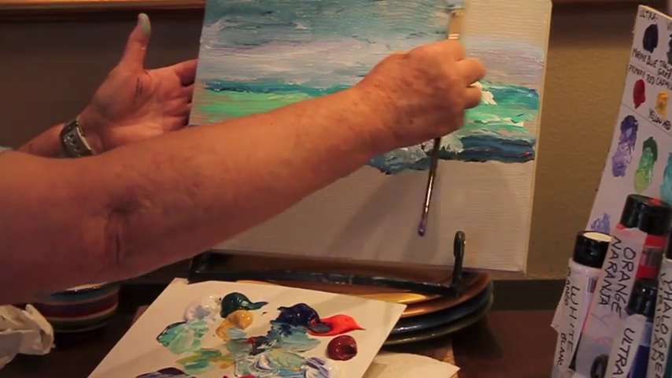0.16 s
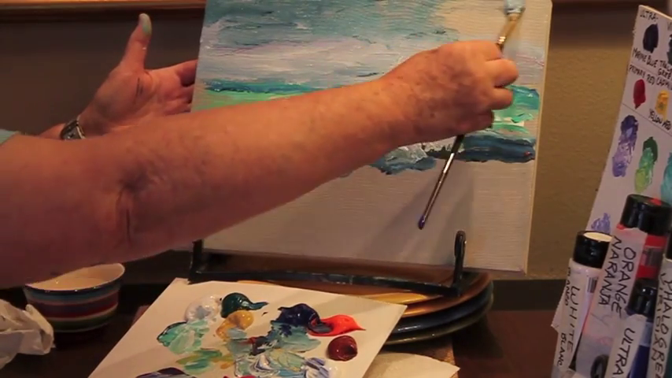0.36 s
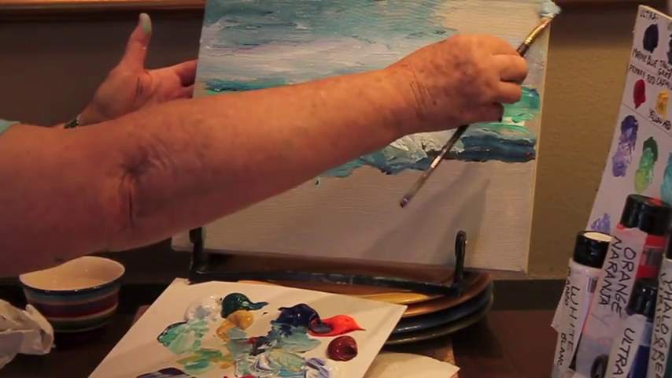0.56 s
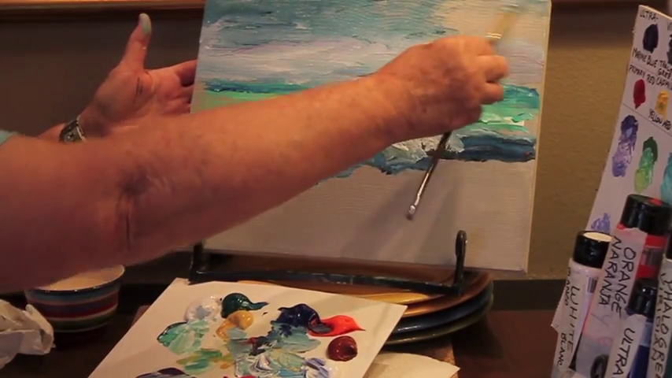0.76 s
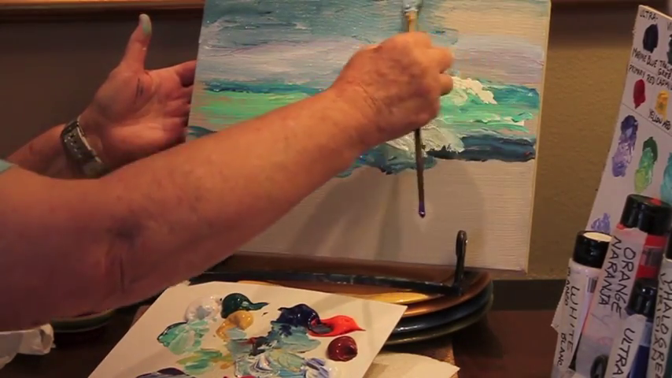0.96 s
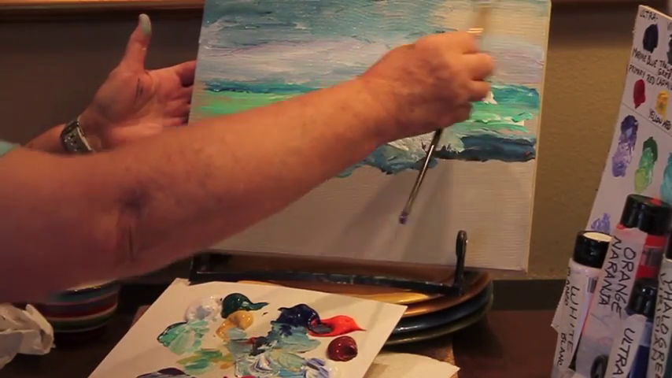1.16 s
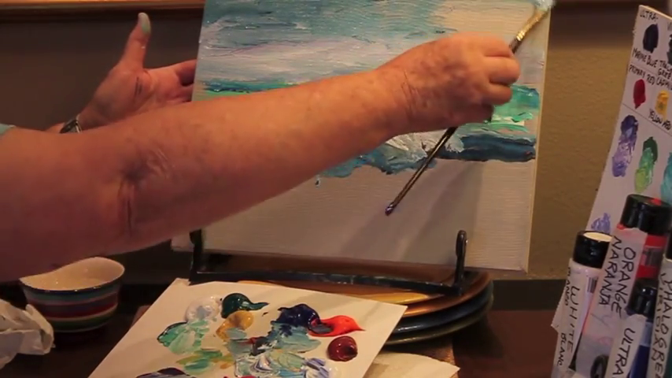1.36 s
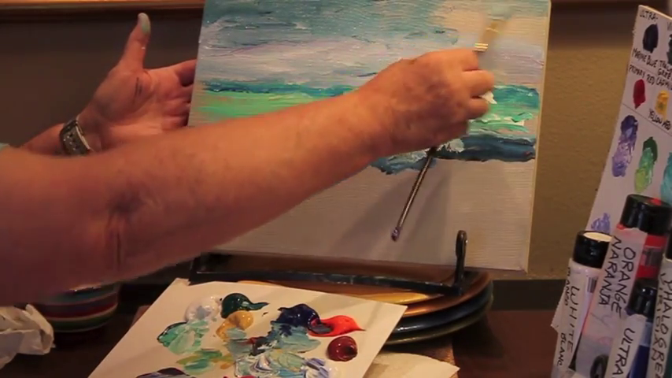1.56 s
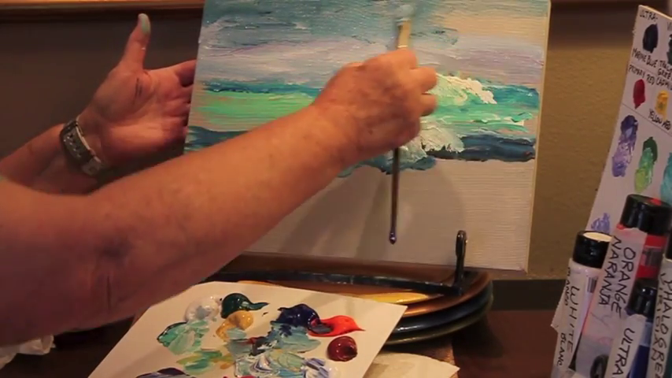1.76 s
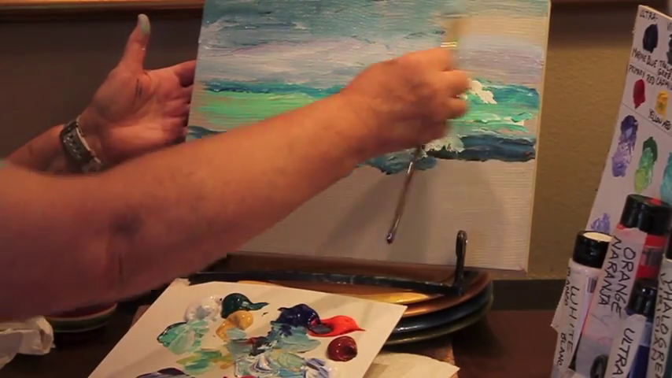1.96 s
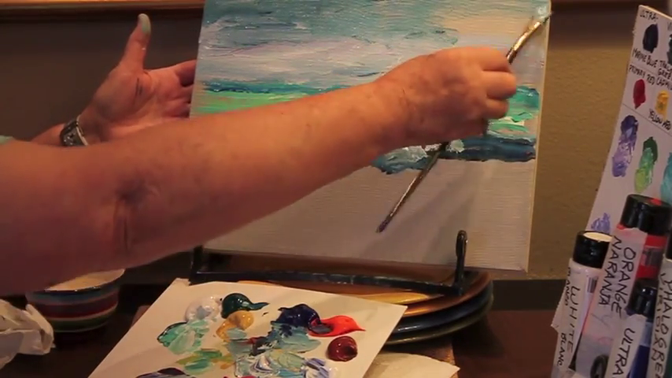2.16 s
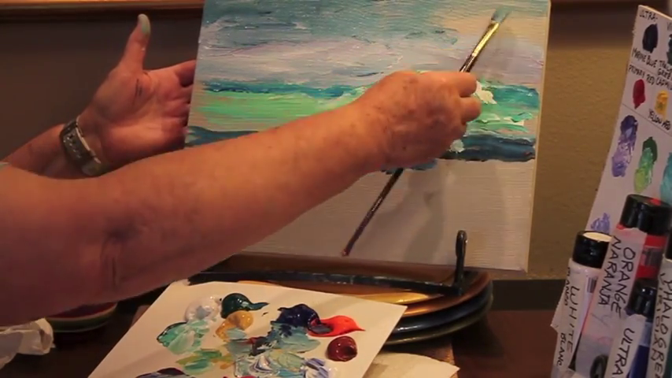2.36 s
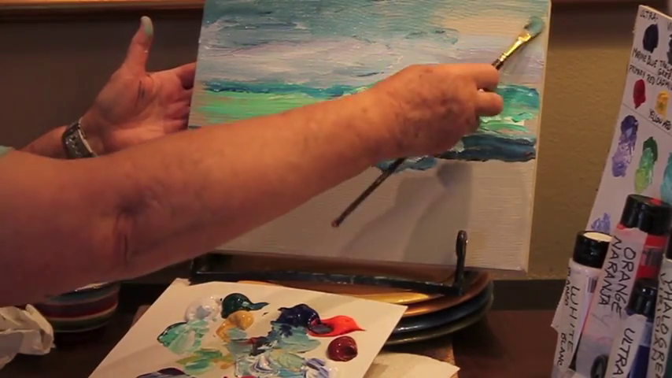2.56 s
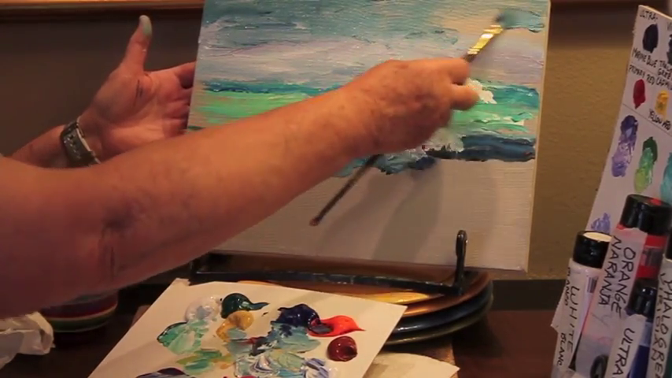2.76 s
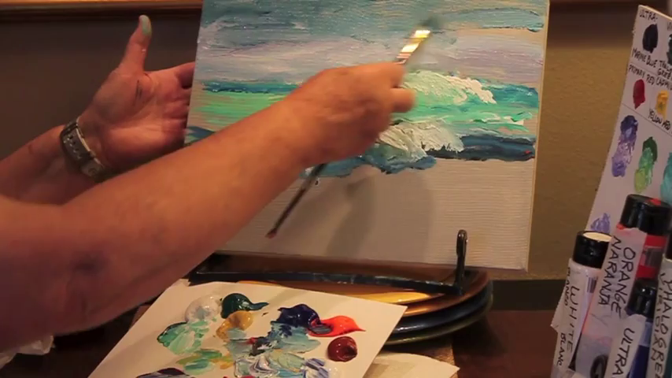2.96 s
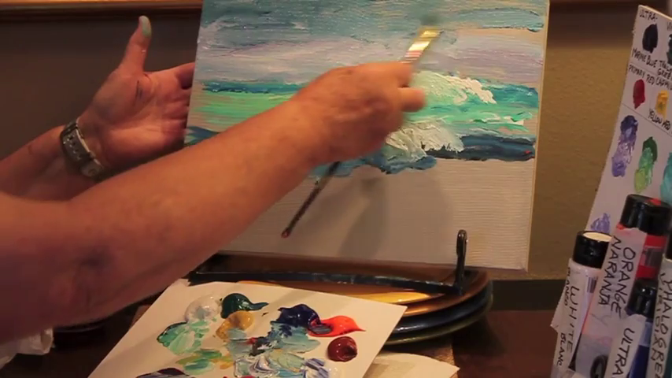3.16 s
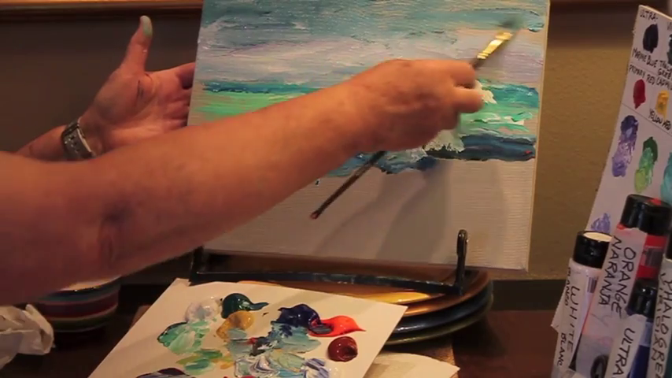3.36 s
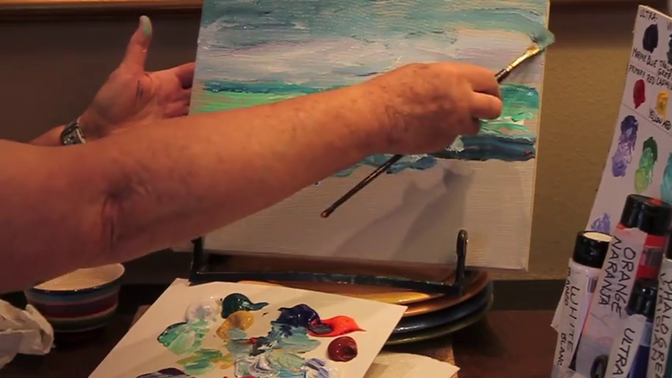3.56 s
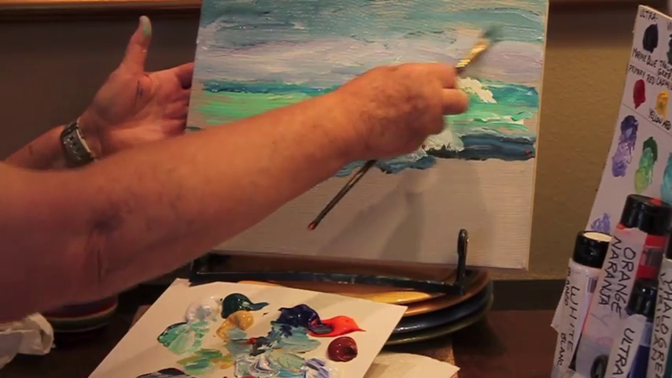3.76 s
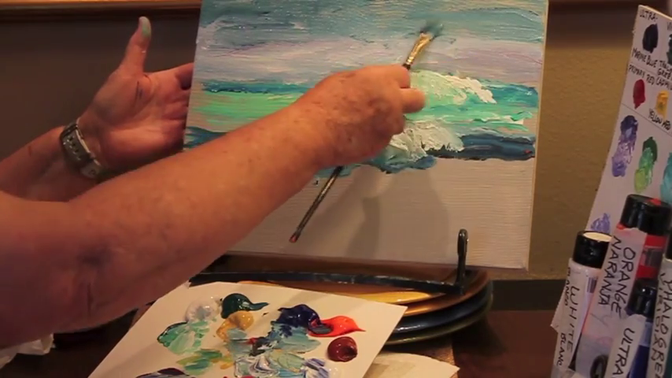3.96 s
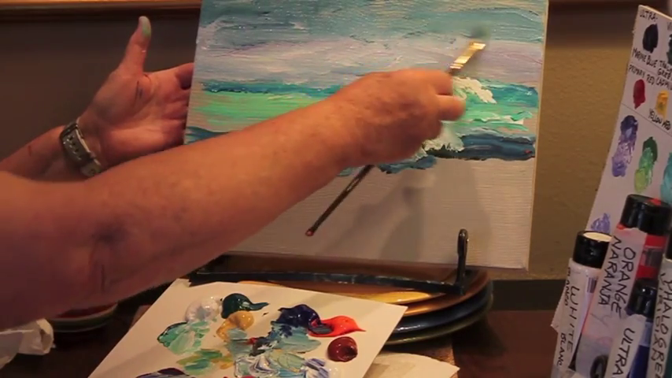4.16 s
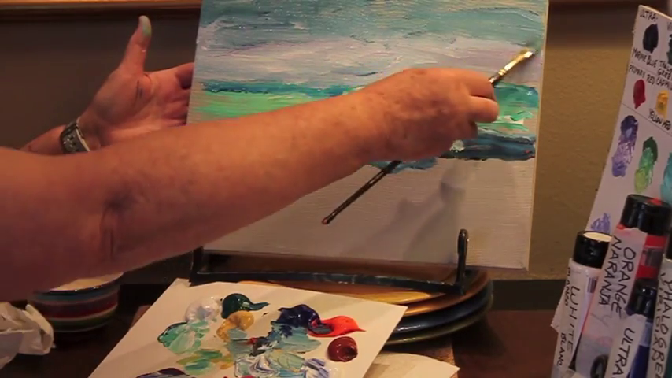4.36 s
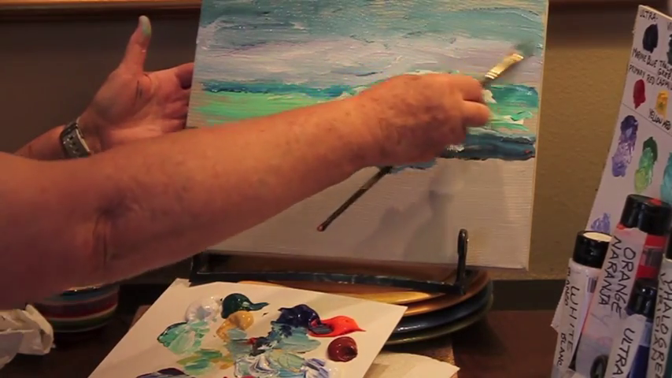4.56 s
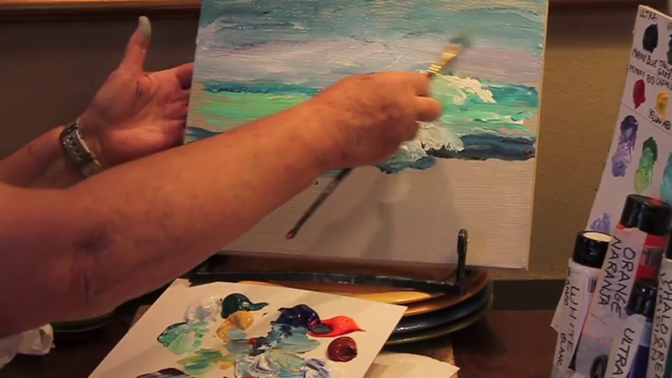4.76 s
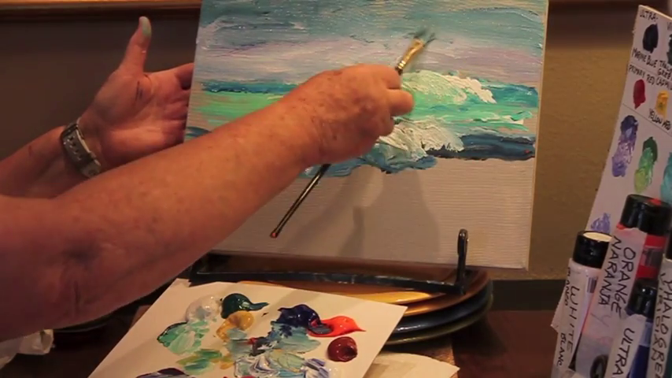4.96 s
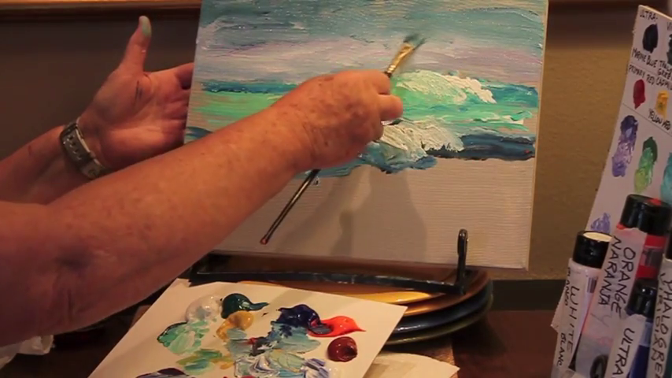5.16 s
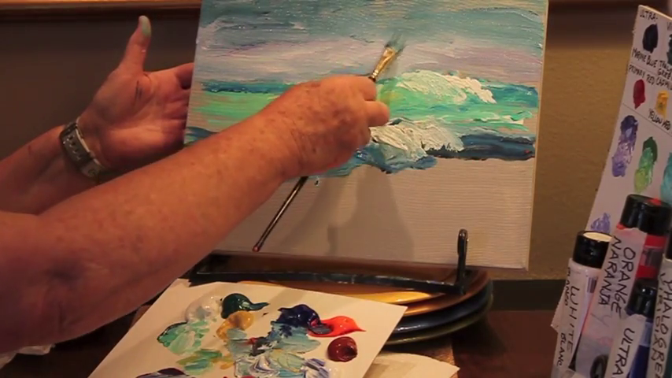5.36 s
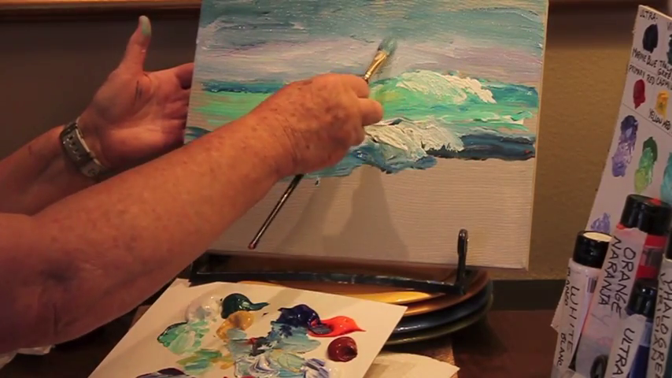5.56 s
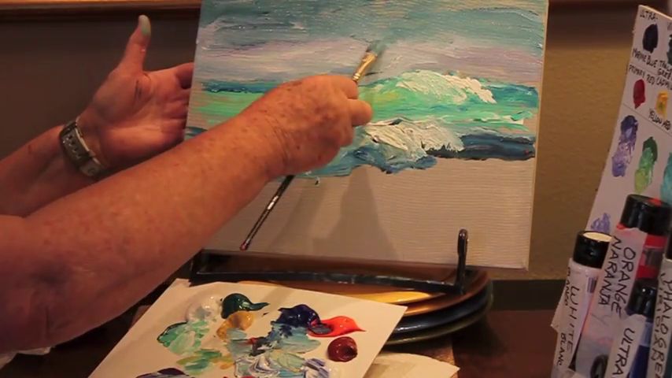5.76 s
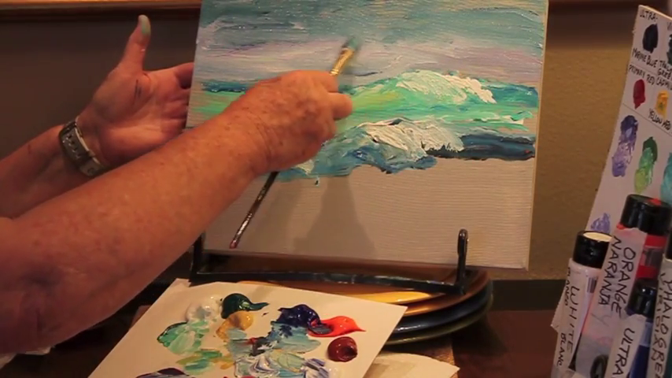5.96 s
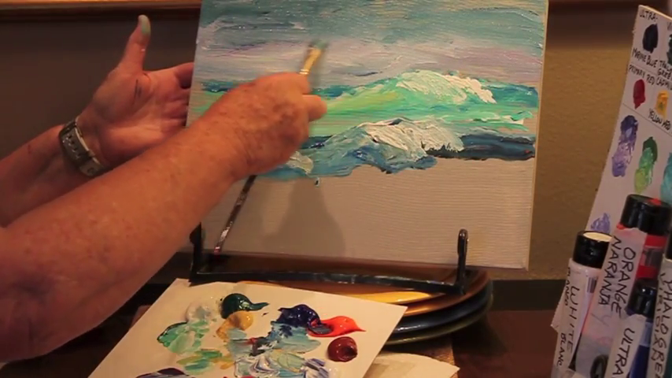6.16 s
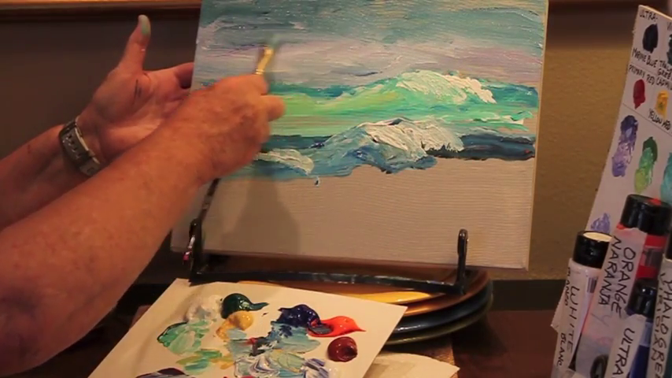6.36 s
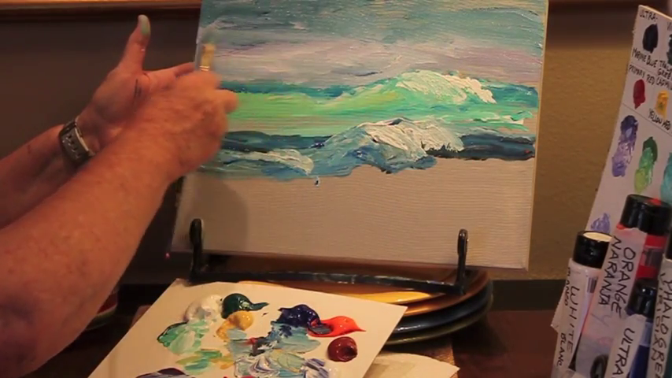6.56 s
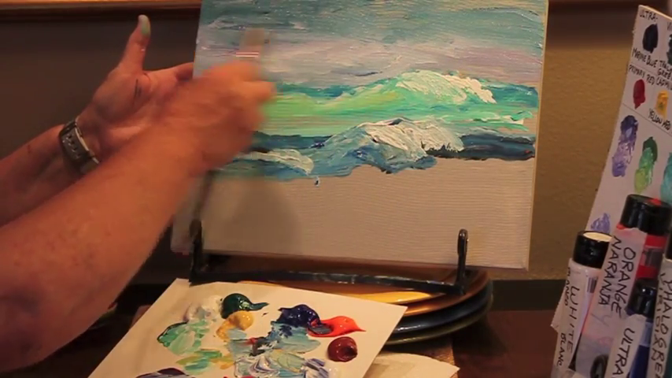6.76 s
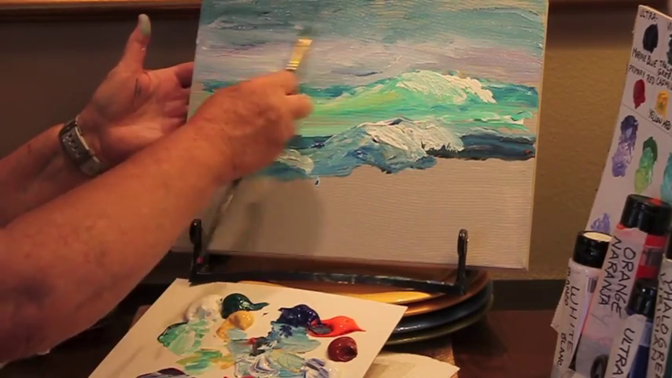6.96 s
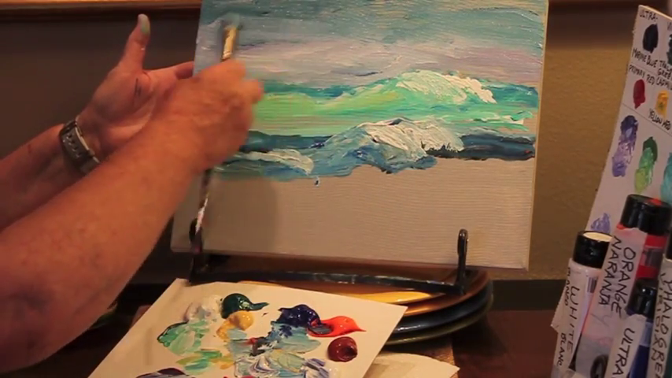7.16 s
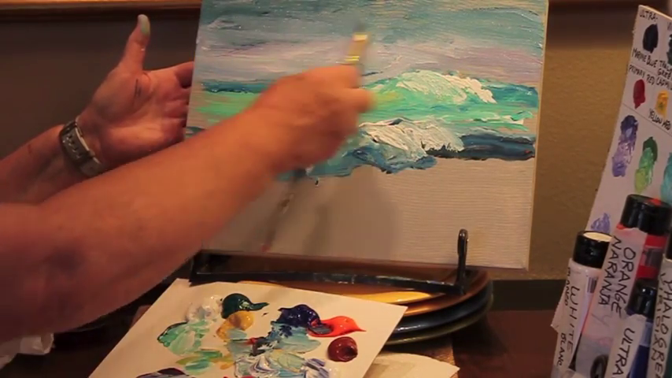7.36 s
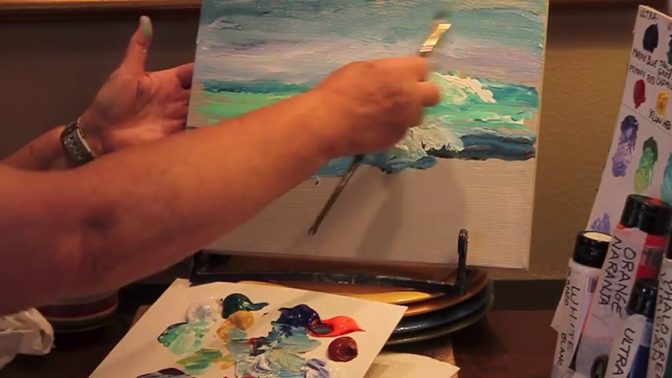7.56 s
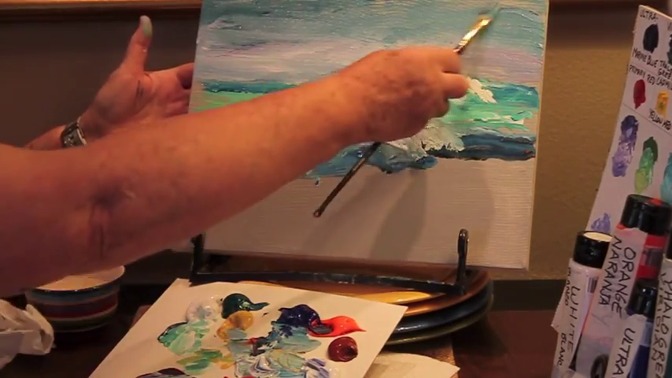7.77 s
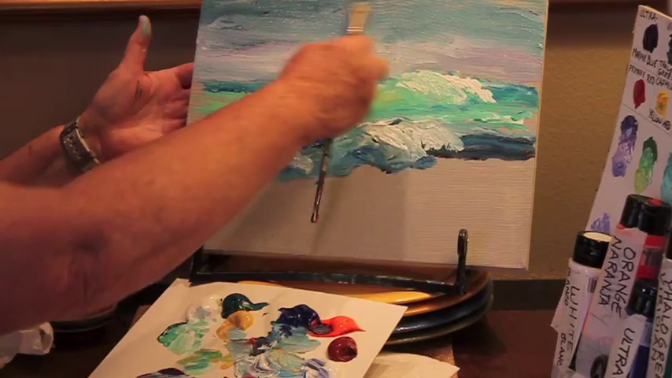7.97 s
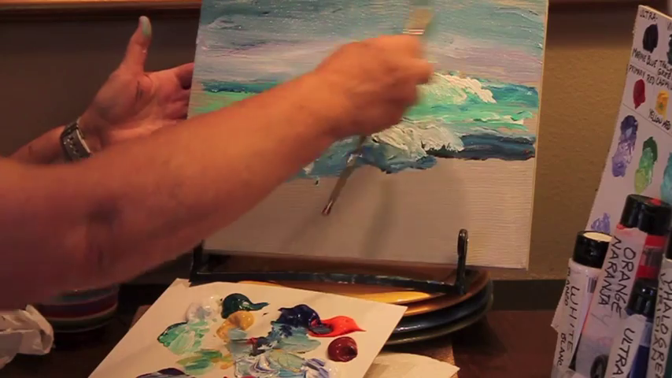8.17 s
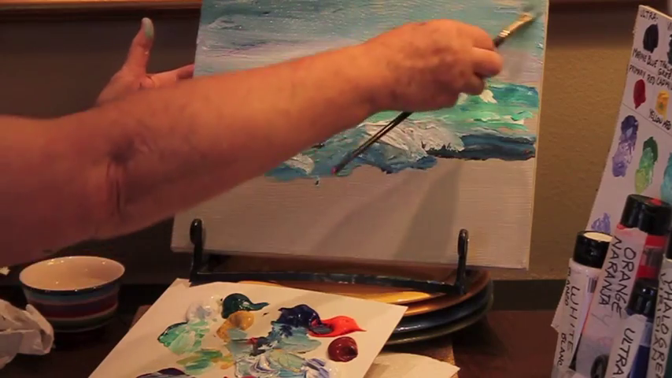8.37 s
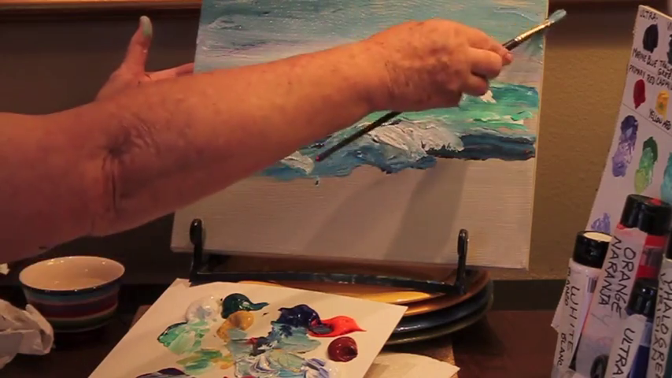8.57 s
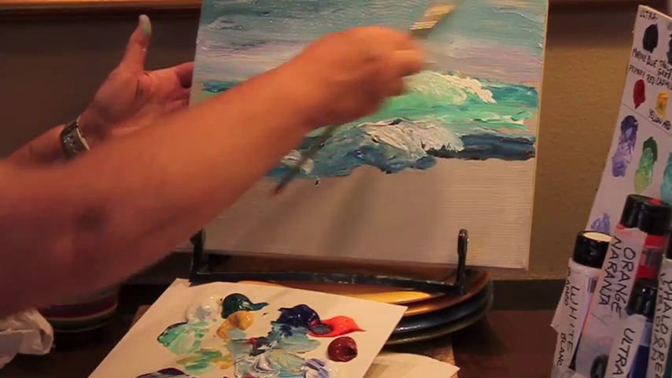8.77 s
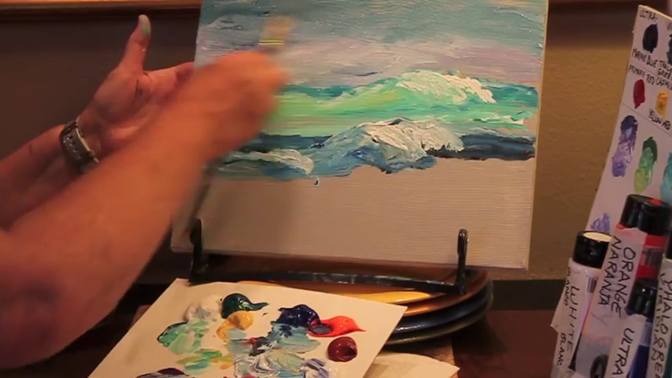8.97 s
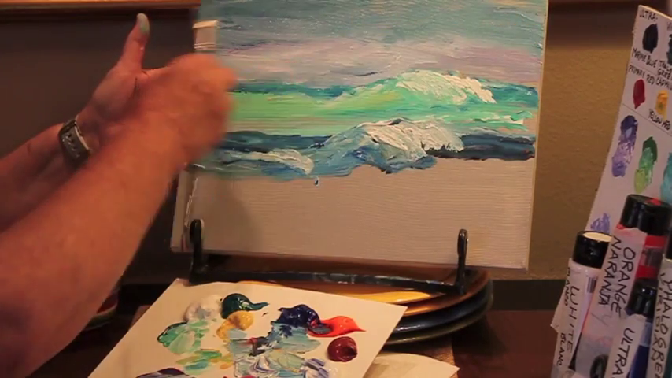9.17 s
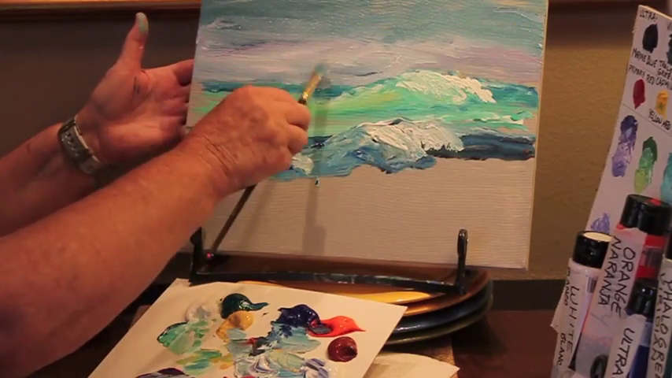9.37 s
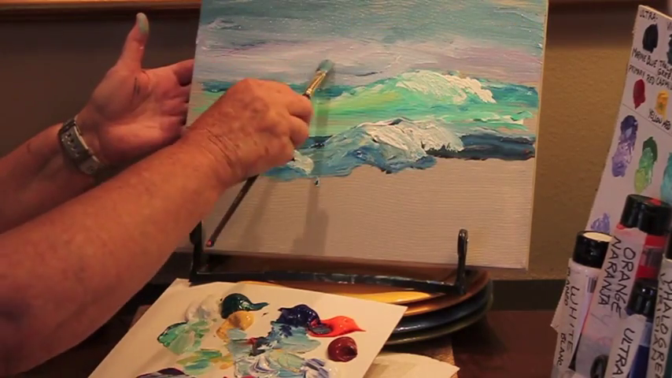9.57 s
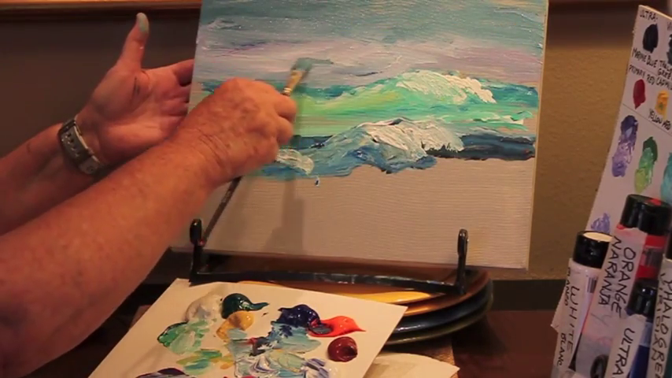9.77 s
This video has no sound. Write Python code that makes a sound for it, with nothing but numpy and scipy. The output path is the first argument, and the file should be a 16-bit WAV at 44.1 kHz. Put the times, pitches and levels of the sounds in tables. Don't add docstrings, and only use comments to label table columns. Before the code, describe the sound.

Dry, bristly brush strokes rasp and tick on a resonant canvas board, loud at first then lighter, above a faint steady throbbing hum indoors.

```python
import sys
import numpy as np
from scipy import signal
from scipy.fft import rfft, irfft, next_fast_len
from scipy.io import wavfile
from scipy.ndimage import uniform_filter1d

SR = 44100
rng = np.random.default_rng(int(sys.argv[2]) if len(sys.argv) > 2 else 0)


def ratio(d):
    e = np.asarray(d, float) / 20
    return 10 ** e


def dump(signal):
    limited = np.clip(np.atleast_2d(signal).T, -1, 1)
    pcm = np.round(limited * 32767).astype(np.int16)
    wavfile.write(sys.argv[1], SR, pcm)


N = 432621
T = np.arange(N) / SR
SLOW_T = np.arange(0, N + 40, 40) / SR


def rms_one(x):
    return x / np.sqrt(np.mean(x ** 2) + 1e-20)


def fft_grid():
    size = next_fast_len(N)
    return size, np.arange(size // 2 + 1) * SR / size + 1


def colour(x, points):
    hz, db = np.transpose(points)
    size, f = fft_grid()
    level_db = np.interp(np.log(f), np.log(hz), db)
    return irfft(rfft(x, size) * ratio(level_db), size)[:N]


def band(x, lo_hz, hi_hz):
    return signal.sosfilt(signal.butter(2, [lo_hz, hi_hz], "band", fs=SR, output="sos"), x)


def drift(rate_hz):
    r = np.exp(-80 * np.pi * rate_hz / SR)
    noise = rng.standard_normal(len(SLOW_T) + 2000)
    settled = signal.lfilter([1], [1, -2 * r, r * r], noise)[2000:]
    return rms_one(settled)


def gain(db):
    return np.interp(T, SLOW_T, ratio(db))


# (frequency [Hz], level per Hz [dB])
AIR_COLOUR = [(46, -23), (58, -8), (110, -5), (200, -4.5), (260, 0), (330, -8.5), (440, -0.5), (520, -6.5),
              (700, -7.5), (1000, -9.5), (1600, -17), (3000, -20), (8000, -25), (15800, -30)]


def air():
    rush = rms_one(colour(rng.standard_normal(N), AIR_COLOUR))
    return gain(-52.5 + 0.5 * drift(2.2)) * rush


# (frequency [Hz]), then their (level [dB])
HUM_HZ = [58.4, 101.96, 120.01, 167.1, 178.41, 203.9, 280.38, 287.77, 291.97, 407.82, 440.72, 451.38,
          467.15]
HUM_DB = [-76, -74.5, -67.5, -73.5, -65.5, -70, -68, -65, -55, -65, -67.5, -68.5, -61]
PAIR_DB = [-56.5, -57.5]
# (time [s], lead of the faster one [turns])
MOTOR_SLIP = [
    (-.23, 0),
    (4.62, 9),
    (5.25, 10),
    (5.81, 11),
    (6.72, 13),
    (7.29, 14),
    (9.14, 17),
    (10.22, 19),
]


def motors():
    pair_hz = 233.58
    lines = 0
    for hz, db in zip(HUM_HZ, HUM_DB):
        lines = lines + ratio(db) * np.sin(2 * np.pi * (hz * T + rng.random()))
    lead_turns = np.interp(T, *np.transpose(MOTOR_SLIP)) + 0.5
    slower = ratio(PAIR_DB[0]) * np.cos(2 * np.pi * pair_hz * T)
    faster = ratio(PAIR_DB[1]) * np.cos(2 * np.pi * (pair_hz * T + lead_turns))
    return np.sqrt(2) * (lines + slower + faster)


# (delay [s], level [dB])
ECHOES = [
    (.0013, -25.5),
    (.0031, -27),
    (.0047, -18.5),
]


def room(x):
    t60_s, tail_db = 0.25, -12.5
    u = np.arange(SR // 2) / SR
    tail = band(rng.standard_normal(len(u)), 410, 6300) * ratio(-60 * u / t60_s) * (u > 0.006)
    tail = ratio(tail_db) * tail / np.linalg.norm(tail)
    for delay, db in ECHOES:
        tail[round(delay * SR)] = ratio(db)
    return signal.fftconvolve(x, tail)[:N]


# (time [s], peak level [dB], low part relative to it [dB])
PAINT_TICKS = [(0.108, -18, -14), (0.2032, -15, -21), (0.4415, -24, -16), (0.7607, -23, -12),
               (1.1804, -21, -16), (1.506, -28, -11), (2.0344, -17, -16), (2.8983, -30, -11),
               (4.2087, -26, -6), (4.3056, -37, -15), (4.5979, -37, -11), (4.8514, -33, -15),
               (4.8948, -42, -16), (4.9631, -40, -17), (5.0394, -42, -10), (5.1362, -43, -15),
               (5.2465, -39, -15), (5.2894, -42, -14), (6.1793, -40, -21), (6.3904, -42, -21),
               (6.5271, -39, -19), (6.996, -30, -22), (8.9391, -27, -9), (9.7737, -42, -17)]


def ticks():
    high, low = np.zeros((2, N))
    u = np.arange(300)
    for s, db, low_db in PAINT_TICKS:
        burst = rng.standard_normal(300) * np.exp(-u / SR / 0.0011)
        at = round(s * SR)
        high[at:at + 300] += ratio(db + 0.5) * burst[:N - at]
        low[at:at + 300] += ratio(db + low_db - 10.0) * burst[:N - at]
    return band(high, 9300, 15500) + band(low, 2000, 7000)


# (time [s], length [s], thread rate at start [Hz], thread rate at end [Hz], level [dB])
THREAD_DRAGS = [
    (0.053, 0.034, 467, 560, -45.5),
    (.24, 0.032, 472, 550, -46),
    (.35, 0.031, 466, 542, -47.5),
    (2.06, 0.039, 476, 540, -46),
    (3.423, 0.028, 470, 542, -51),
    (3.852, 0.042, 680, 700, -53),
    (5.348, 0.017, 567, 600, -57),
]
DRAG_TONES_DB = [-3.5, 4, -2, -30, -12]


def zips():
    out, waver = np.zeros(N), np.interp(T, SLOW_T, drift(60))
    for s, length, hz0, hz1, db in THREAD_DRAGS:
        at = slice(round(s * SR), round((s + length) * SR))
        u = (T[at] - s) / length
        rate_hz = (hz0 + (hz1 - hz0) * np.abs(u) ** 0.75) * (1 + 0.0093 * waver[at])
        phase = 2 * np.pi * np.cumsum(rate_hz) / SR
        tones = sum(ratio(d) * np.sin((k + 1) * phase + k * k) for k, d in enumerate(DRAG_TONES_DB))
        out[at] += ratio(db) * np.sqrt(np.abs(np.sin(np.pi * u))) * tones
    return out


# (start [s], length [s], board ring [dB], bristle tips relative
# to it [dB], board body relative to it [dB])
HAND_SWINGS = [(-0.023, 0.17, -40.5, 2.5, -7.5), (0.063, 0.16, -38.5, 4.5, -11),
               (0.15, 0.18, -40.5, 6, -10), (0.265, 0.21, -43.4, 4.5, -6.5),
               (0.399, 0.18, -43.5, 1.5, -10.6), (0.33, 0.43, -52, -1.5, -7),
               (0.699, 0.25, -37.0, 1.7, -11), (0.803, 0.26, -36.5, -2.5, -13.4),
               (1.043, 0.16, -41, -4, -15), (1.035, 0.32, -42, 4.5, -8.5), (1.08, 0.496, -53.5, 2, -7),
               (1.464, 0.17, -40.5, -0.8, -7.1), (1.519, 0.26, -36, 0.5, -10),
               (1.621, 0.28, -41.9, 0, -8.5), (1.868, 0.35, -35.9, 0.5, -8.2),
               (1.987, 0.11, -53, 16, -19.9), (2.028, 0.46, -61, -15, 4.5),
               (2.702, 0.5, -48, -1.5, -2.5), (2.951, 0.16, -51.5, 7, -2), (3.104, 0.27, -49.5, 4.5, -3),
                 (3.248, 0.15, -49.0, -1, -5), (3.19, 0.45, -55.5, 0, 0), (3.623, 0.31, -44, -0.5, -6),
                 (3.807, 0.24, -51.5, 3.5, 0), (3.796, 0.2, -44, 2.7, -3), (3.876, 0.52, -54, -17, -18),
                 (4.022, 0.24, -57.5, 11.5, 0), (4.139, 0.18, -48.8, 3, -1), (4.23, 0.223, -53, -0.5, -5),
                 (4.234, 0.5, -65, -3, -16), (4.537, 0.16, -48, -0.4, -5.5), (4.612, 0.24, -52, -1, 1),
                 (4.719, 0.25, -52, 1.2, 1), (4.8, 0.39, -65, 1.6, -4), (5.028, 0.46, -63.5, 0.5, -1),
               (6.064, 0.366, -70.5, 8, 3.2), (6.259, 0.53, -71, 11, 9), (6.473, 0.25, -59, 5.5, -6.0),
               (6.94, 0.22, -54, 3.6, -2), (6.936, 0.333, -61, -0.1, -3), (7.278, 0.26, -53.6, 1.3, -4.4),
               (7.394, 0.2, -47.5, 2, -4.5), (7.486, 0.34, -46.5, -2.5, -6),
               (7.763, 0.41, -44.5, -0.5, -5.5), (7.82, 0.27, -43, 3, -20.0), (8.088, 0.136, -50, 5, -4),
               (8.11, 0.28, -44.5, 1.8, -7.5), (8.247, 0.34, -54.5, 2.5, -5), (8.595, 0.13, -52, -1.0, -9),
               (8.752, 0.17, -58, 3.5, -10), (8.821, 0.37, -43, -1.3, -8), (9.711, 0.14, -67, 5, 0)]


def strokes():
    swings = np.array(HAND_SWINGS)
    start, length, ring_db, tips_db, body_db = swings.T[:, :, None]
    u = np.clip((SLOW_T - start) / np.maximum(length, 0.02), 0, 1)
    speed = np.abs(np.sin(np.pi * u ** 0.85)) + 1e-3
    speed_power = 2.43
    body = body_db - 1.03 + 5.1 * (u - 0.5)
    scratch = 0.23 * tips_db - 4 + 0.5 * (u - 0.5)
    tips = tips_db - 2 * (u - 0.5)
    totals_db = []
    for rel in [0, body, scratch, tips]:
        power = ratio(2 * (ring_db + rel)) * speed ** (2 * speed_power)
        totals_db.append(10 * np.log10(np.sum(power, axis=0)))
    ring, *rest = totals_db
    return [ring] + [one - ring for one in rest]


# (time [s], jump [dB])
SLAPS = [
    (0.105, 3),
    (0.202, 4),
    (1.504, 10),
    (4.596, 4),
    (6.994, 2),
    (8.105, 7),
    (8.615, 7),
]


def landings():
    hover_s, settle_s, overshoot = 0.017, 0.029, 0.45
    s, jump_db = np.transpose(SLAPS)[:, :, None]
    after = SLOW_T - s
    hover = (overshoot - 1) * np.exp(-np.abs(after) / hover_s)
    surplus = overshoot * np.exp(-np.abs(after) / settle_s)
    step = np.sum(jump_db * np.where(after < 0, hover, surplus), axis=0)
    return uniform_filter1d(step, size=4)


def flicks(per_s, spread_db):
    sizes = ratio(spread_db * np.minimum(rng.exponential(1, N), 4.0))
    clicks = sizes * rng.choice([-1, 1], N)
    return rms_one(clicks * (rng.random(N) < per_s / SR))


def resonance(x, hz, width_hz):
    r = np.exp(-np.pi * width_hz / SR)
    top = np.array([1, 0, -1]) * (1 - r * r) / 2
    return signal.lfilter(top, [1, -2 * r * np.cos(2 * np.pi * hz / SR), r * r], x)


# (frequency [Hz], width [Hz], level [dB])
BOARD_MODES = [(1035, 24, -21), (1445, 20, -21), (1839, 31, 5), (2183, 28, 2.5), (2436, 22, -6),
               (2610, 73, -2), (2842, 46, 0.5), (3010, 61, 5), (3183, 59, -2.5), (3306, 35, 7),
               (3548, 49, 2), (4100, 51, -6), (4400, 79, -10), (5750, 60, -2), (7280, 82, -7)]


def ring_board(dense):
    ringing = dense
    for hz, width_hz, db in BOARD_MODES:
        ringing = ringing + gain(db - 3.5 + 2.7 * drift(8.8)) * resonance(dense, hz, width_hz)
    return ringing


# (frequency [Hz], level per Hz [dB])
BRISTLE_COLOUR = [(150, -48), (320, -3.5), (500, -11.5), (1000, -8.5), (1700, -6.5), (2200, -8), (2450, -6),
                  (3200, -7), (3700, -5), (5000, -3.5), (7000, -6), (9000, -7), (12000, -4), (15000, -8.5)]
LAYER_EDGES_HZ = [350, 2000, 4500, 9000, 16500]
# (frequency [Hz]), then (layer number, 0 body to 4 very top)
LAYER_MID_HZ = [1800, 2450, 3300, 5400, 11000, 15500]
LAYER_PLACE = [0, 1, 1, 2, 3, 4]
# (time [s], centre of the board ring [Hz])
BRUSH_SPOT = [
    (0.0, 2630),
    (2.1, 2910),
    (2.37, 2260),
    (2.81, 2820),
    (4.8, 2550),
    (5.51, 2450),
    (8.82, 3200),
    (9.31, 2370),
    (9.8, 2590),
]


def brush():
    ring_db, body, scratch, tips = strokes()
    rel_db = [body, 0 * body, scratch, tips, 1.4 * tips]
    centre_hz = np.interp(SLOW_T, *np.transpose(BRUSH_SPOT))
    dense = ring_board(flicks(14000, spread_db=1.5))
    snaps = flicks(400, spread_db=3.0)
    size, f = fft_grid()
    snap_db = -12.5 + 2.5 * np.log2(f / 3000)
    touch = rfft(colour(dense, BRISTLE_COLOUR), size)
    touch = touch + rfft(colour(snaps, BRISTLE_COLOUR), size) * ratio(snap_db)

    edges = np.searchsorted(f, LAYER_EDGES_HZ)
    own_db = []
    for a, b in zip(edges, edges[1:]):
        own_db.append(10 * np.log10(np.sum(np.abs(touch[a:b]) ** 2) * 2 / size / N))
    own_db.append(own_db[-1])
    offset_db = [rel - own for rel, own in zip(rel_db, own_db)]

    mids = np.geomspace(350, 16500, 21)
    total = 0
    for hz, one in zip(mids, np.eye(len(mids))):
        part = np.interp(np.log(f), np.log(mids), one)
        place = np.interp(np.log(hz), np.log(LAYER_MID_HZ), LAYER_PLACE)
        k = min(int(place), len(rel_db) - 2)
        u = place - k
        level_db = (1 - u) * offset_db[k] + u * offset_db[k + 1]
        spot_db = 1.75 * np.exp(-(np.log2(hz / centre_hz) / 0.21) ** 2)
        total = total + irfft(touch * part, size)[:N] * gain(level_db + spot_db + 1.78 * drift(10.7))
    judder_db = 0.83 * drift(31)
    return total * gain(ring_db + landings() + judder_db - 0.5)


def scene():
    board = brush() + zips() + ticks()
    return (board + room(board) + motors() + air())[None]


def band_limit(x):
    return signal.sosfilt(signal.butter(12, 16160, fs=SR, output="sos"), x)


def record(dry):
    cutoff_hz = 15740
    mix = colour(dry[0], [(10, 0), (cutoff_hz - 40, 0), (cutoff_hz, -90)])[None]
    return band_limit(mix)


dry = scene()
out = record(dry)
dump(out)
```